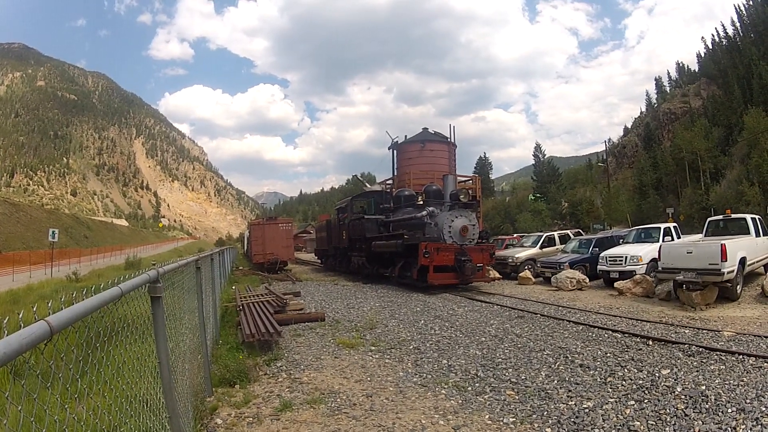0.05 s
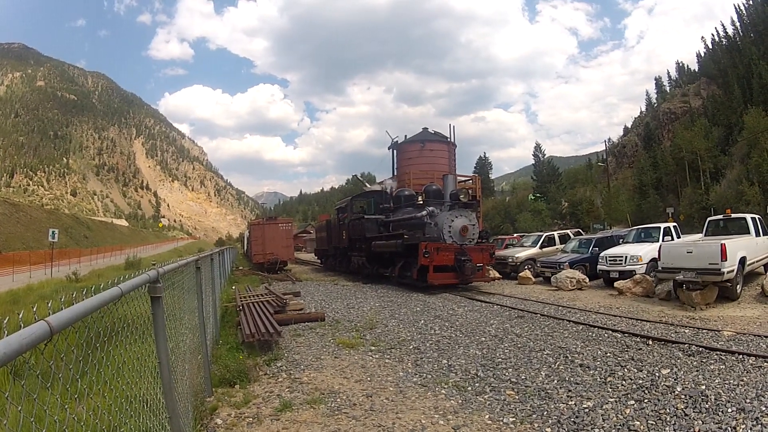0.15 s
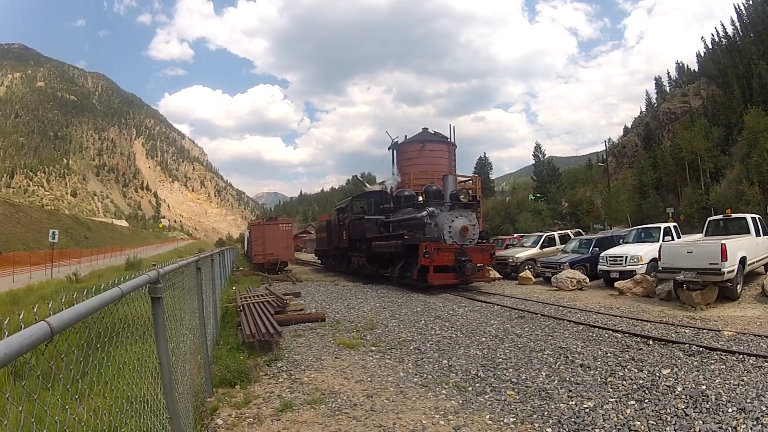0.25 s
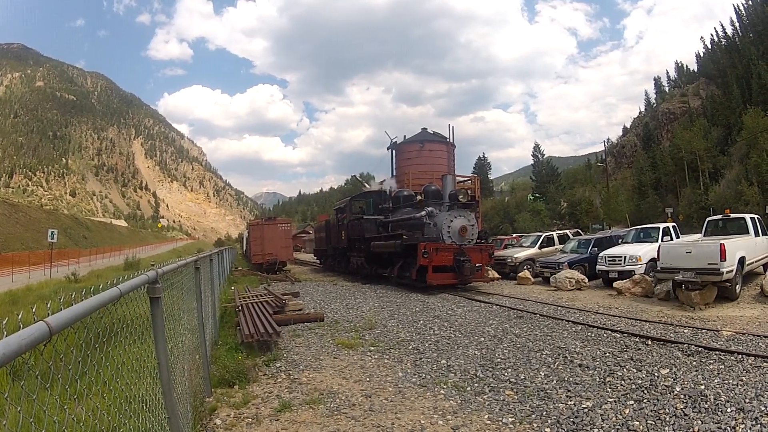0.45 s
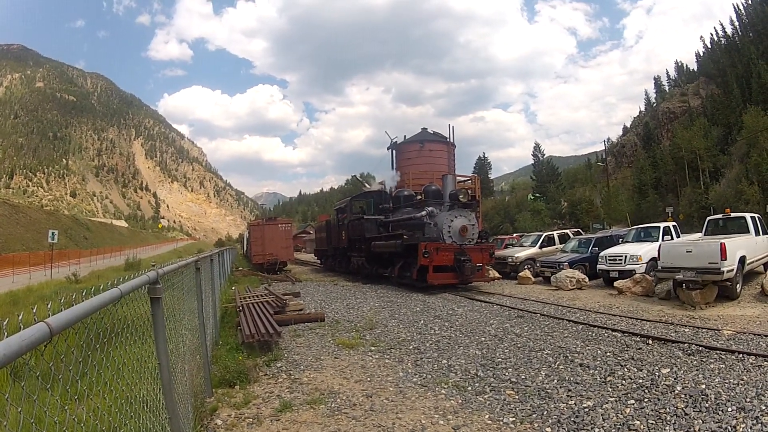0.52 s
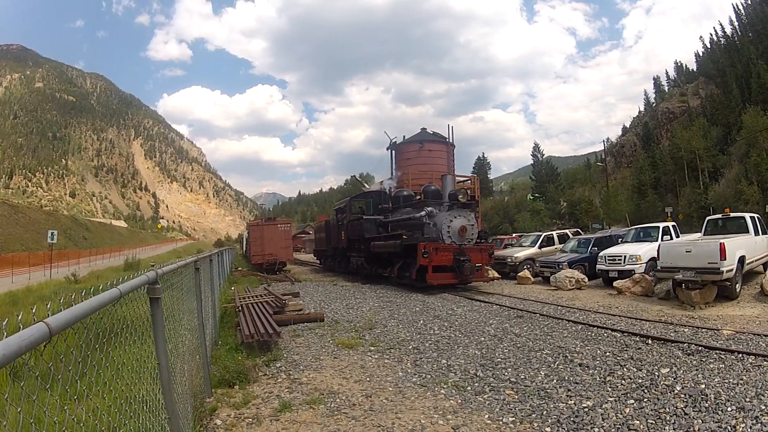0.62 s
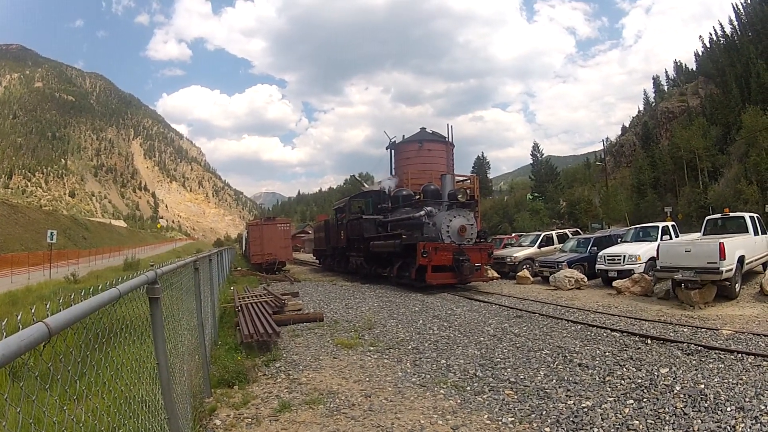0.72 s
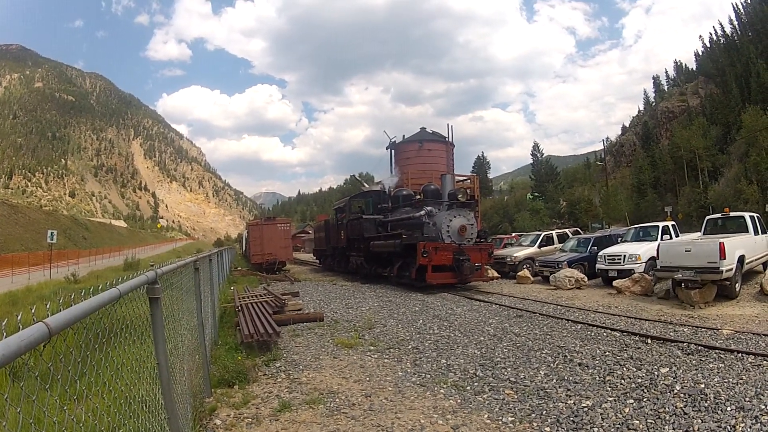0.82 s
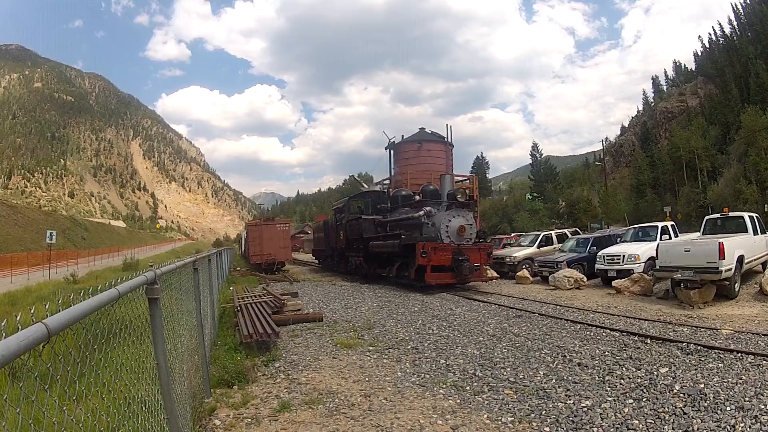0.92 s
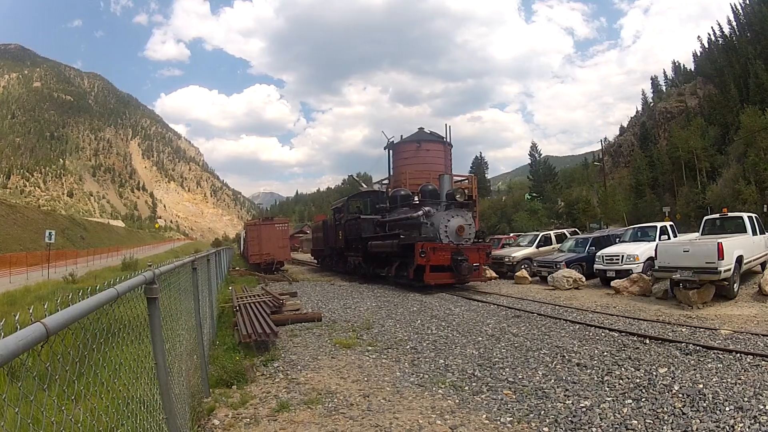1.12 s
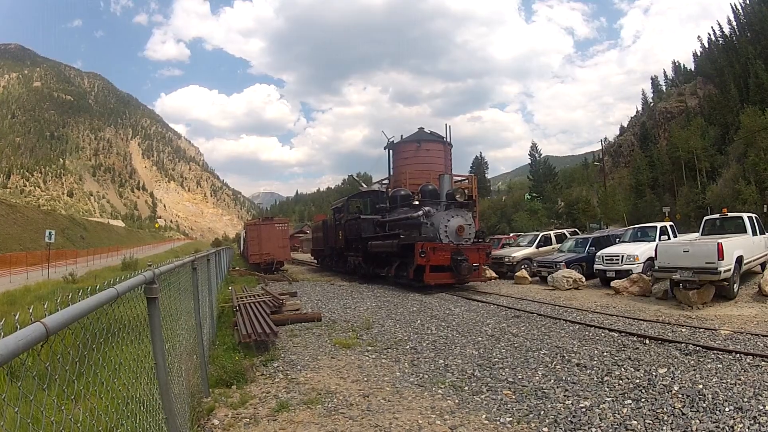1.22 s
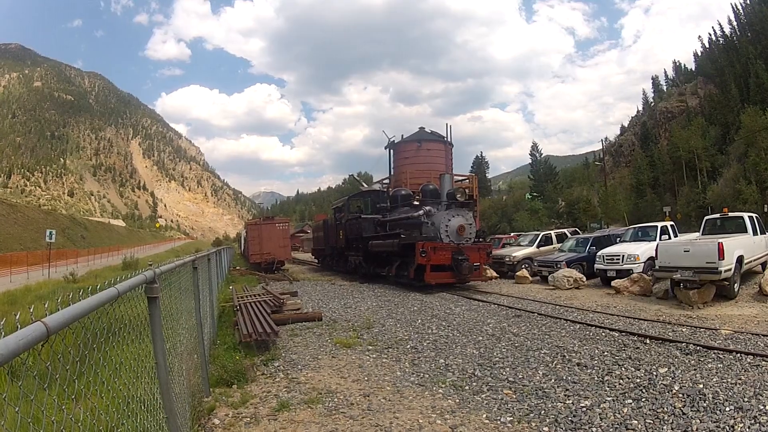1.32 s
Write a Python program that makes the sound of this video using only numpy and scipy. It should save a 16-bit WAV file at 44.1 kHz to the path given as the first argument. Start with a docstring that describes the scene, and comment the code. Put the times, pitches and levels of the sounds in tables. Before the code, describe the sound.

Three quick, breathy steam train whistle toots echo across a mountain valley.

```python
"""Three short toots of a steam locomotive's chime whistle, heard across a mountain valley.
One steam valve drives the chord of pipes and the hiss of the jet; barely open, it leaves a thin squeal.
The whistle reaches the microphone directly, then off the yard and the far slopes, over boiler hiss
and light wind. A coarse mono recorder adds a glassy top."""
import sys
import numpy as np
from scipy import signal
from scipy.fft import rfft, irfft
from scipy.io import wavfile
from scipy.ndimage import uniform_filter1d

SR = 44100
rng = np.random.default_rng(int(sys.argv[2]) if len(sys.argv) > 2 else 0)


def digitize_waveform(pressure):
    """Quantize a signal to 16-bit integers and store it at the path in sys.argv[1].

    Rows of a 2-D input are taken as channels; values are limited to [-1, 1].
    """
    field = np.atleast_2d(pressure).T
    bounded = np.clip(field, -1, 1)
    quanta = np.round(bounded * 32767).astype(np.int16)
    wavfile.write(sys.argv[1], SR, quanta)


N = 59535
T = np.arange(N) / SR
FREQS = np.fft.rfftfreq(N, 1 / SR)

# Pulls of the whistle cord. Each row: peak time in seconds, peak steam flow in dB,
# opening time and closing time in seconds.
CORD_PULLS = [(.281, -28, .090, .074), (.587, -33.7, .110, .096), (.868, -33.9, .126, .094)]
# The chime. Each row: pitch in Hz at full flow, top level in dB, flow in dB at which it speaks,
# onset steepness, share of pitch gained per dB of flow, 2nd and 3rd partial in dB against the 1st.
CHIME_PIPES = [(274, -46.3, -42, 1.5, .0004, -24, -24), (304, -36.3, -42.5, 1.6, .0007, -21, -9),
               (351, -39.7, -42.5, 1.4, .0016, -15, -5), (393, -30.5, -39.3, 1.9, .0027, -28, -33),
               (438, -42, -33, 2.4, .0022, -24, -18), (550, -29.3, -35.7, 3.6, .0032, -36, -29),
               (697, -54.5, -53, 2.2, .0024, -25, -25)]
# Resonances the jet blows without locking to them. Each row: centre in Hz, width in Hz,
# level in dB at full flow, growth in dB per dB of flow.
JET_RESONANCES = [(478, 35, -51, .9), (650, 25, -53.5, .8), (805, 30, -58, .8), (888, 24, -46, .95),
                  (1006, 18, -48.5, .75), (1396, 42, -41.5, .85), (1520, 110, -45, .8),
                  (2040, 46, -33.7, 1.15), (2152, 56, -35, 1.7), (2400, 100, -37.3, 1.05),
                  (2760, 80, -46.5, 1.3), (3053, 22, -50.5, 1.2)]
# Broad hiss of the jet. Each row: frequency in Hz, relative level in dB.
JET_SPECTRUM = [(60, -55), (210, -33), (290, -5), (600, -7), (830, -9), (1130, -10), (1400, -2),
                (1850, -3.5), (1990, 4), (2450, -1), (2600, -8), (3300, -13), (4000, -18), (4900, -14),
                (5700, -26)]
# Thin hiss at the valve seat. Each row: frequency in Hz, relative level in dB.
SEAT_SPECTRUM = [(500, -25), (1500, -6), (2600, 0), (3300, 1), (3900, -3), (4400, 2), (5000, 1), (5750, -8)]
# Overblown tones. Each row: start and end in seconds, pitch in Hz, level in dB.
SQUEALS = [(.48, .84, 2441, -45.5), (.58, 1.08, 1473, -57)]
# Returns from yard and slopes. Each row: delay in seconds, level in dB, centre in Hz, width in octaves.
VALLEY_ECHOES = [(.05, -22, 290, .25), (.07, -22, 900, .5), (.105, -24, 2000, 1.5), (.115, -20, 560, .25),
                 (.14, -23, 1550, .5), (.21, -23, 310, .3), (.3, -25, 950, .4), (.36, -25.5, 400, 1.0)]
# Boiler hiss. Each row: frequency in Hz, relative level in dB.
BOILER_SPECTRUM = [(150, -12), (290, -3), (600, -13), (1100, -12), (1330, -9), (1540, -2), (1800, -13),
                   (2050, 0), (2200, 2), (2450, 0), (2720, 3), (2860, -10), (3150, -13), (3350, -8),
                   (3600, -15), (4000, -18), (4900, -15), (5700, -26)]
# Its slight swell at the microphone. Each row: time in seconds, level in dB.
BOILER_LEVELS = [(0, -54.3), (.5, -53.5), (1.05, -51), (1.35, -53.3)]
# Wind and low rumble. Each row: frequency in Hz, relative level in dB.
WIND_SPECTRUM = [(12, -6), (28, 0), (45, -3), (65, 0), (98, 1), (130, -5), (220, -6), (400, -18),
                 (1000, -40)]

FULL_DB, SHUT_DB = -30, -80  # steam flow
TOOT_SWING_DB, TOOT_ROUNDNESS = 20, 2.15  # swing over the opening or closing time; rounder is flatter
HANG_FROM_S, HANG_TO_S, HANG_DB, HANG_SAG_DB_PER_S = .6, .8, -44.5, 52
DROOP_DB_PER_S = 4  # the steam pressure eases from toot to toot, which flattens the pipes
PITCH_WAVER, WAVER_HZ, FLUTTER, FLUTTER_HZ, SQUEAL_WAVER = .0055, 35, .13, 60, .003
JET_DB, JET_GROWTH, JET_THROB = -37.5, .95, .35
RESONANCE_RISE = .0005  # share of pitch per dB of flow
SEAT_DB, SEAT_OPENS_DB, SEAT_LEAD_S = -56, -57, .02
TAIL_DB, TAIL_T60_S, TAIL_DULL_HZ = -25, 3.0, 2500
WIND_DB = -60.7
HOLD_HZ, BAND_HZ, EDGE_HZ = 12000, 5880, 15350


def pipes(flow):
    """Each pipe speaks above its own flow, levels off, and goes sharp as it is blown harder."""
    push_db = flow - FULL_DB - DROOP_DB_PER_S * T
    chord = np.zeros(N)
    for hz, db, speaks_db, steepness, rise, second_db, third_db in CHIME_PIPES:
        phase = phase_of(hz * (1 + rise * push_db + PITCH_WAVER * wander(WAVER_HZ)))
        level = amp(db) / (1 + amp(steepness * (speaks_db - flow)))
        for k, partial_db in enumerate((0, second_db, third_db), 1):
            flutter = 1 + FLUTTER * wander(FLUTTER_HZ)
            chord += np.sqrt(2) * level * amp(partial_db) * flutter * np.sin(k * phase)
    return chord


def steam_flow():
    """Valve flow in dB: each pull is a rounded arch; the valve hangs slightly open after the second."""
    hang = gate(HANG_FROM_S, HANG_TO_S) * amp(HANG_DB - HANG_SAG_DB_PER_S * (T - HANG_FROM_S))
    power = amp(SHUT_DB) ** 2 + hang ** 2
    for peak_s, db, opening_s, closing_s in CORD_PULLS:
        from_peak = abs(T - peak_s) / np.where(T < peak_s, opening_s, closing_s)
        power += amp(db - TOOT_SWING_DB * from_peak ** TOOT_ROUNDNESS) ** 2
    return 10 * np.log10(power)


def jet(flow, chord):
    """Steam hisses over the lips and excites the upper resonances, throbbing with the chord."""
    push_db = flow - FULL_DB
    hiss = amp(JET_DB + JET_GROWTH * push_db) * coloured(JET_SPECTRUM)
    for hz, width_hz, db, growth in JET_RESONANCES:
        phase = phase_of(hz * (1 + RESONANCE_RISE * push_db))
        band = wander(width_hz / 2) * np.cos(phase) + wander(width_hz / 2) * np.sin(phase)
        hiss += amp(db + growth * push_db) * band
    beats = abs(signal.hilbert(chord))
    throb = beats / (uniform_filter1d(beats, size=900) + 1e-6) - 1
    return hiss * (1 + JET_THROB * throb)


def seat_hiss(flow):
    """Steam hisses through the valve seat, a little ahead of the pipes, steady once it cracks open."""
    early_flow = np.interp(T + SEAT_LEAD_S, T, flow)
    return amp(SEAT_DB) * coloured(SEAT_SPECTRUM) / (1 + amp(2 * (SEAT_OPENS_DB - early_flow)))


def squeal():
    """Thin overblown tones from a nearly shut valve."""
    tones = np.zeros(N)
    for start, end, hz, db in SQUEALS:
        phase = phase_of(hz * (1 + SQUEAL_WAVER * wander(FLUTTER_HZ)))
        tones += gate(start, end) * amp(db) * unit(np.sin(phase))
    return tones


def valley(whistle):
    """The near yard and the far slopes send back coloured echoes and a long dull tail."""
    tail = rng.standard_normal(N) * amp(-60 * T / TAIL_T60_S) * np.minimum(T / .06, 1)
    response = amp(TAIL_DB) * rfft(tail / np.linalg.norm(tail)) / np.hypot(1, FREQS / TAIL_DULL_HZ)
    for delay, db, hz, octaves in VALLEY_ECHOES:
        colour = np.exp(-.5 * (np.log2((FREQS + 1) / hz) / octaves) ** 2)
        response += amp(db) * colour * np.exp(-2j * np.pi * FREQS * delay)
    return signal.fftconvolve(whistle, irfft(response, N))[:N]


def boiler():
    """The boiler hisses softly behind the whistle."""
    return amp(np.interp(T, *np.transpose(BOILER_LEVELS))) * coloured(BOILER_SPECTRUM)


def wind():
    """Light wind lays a low rumble under the valley."""
    return amp(WIND_DB) * coloured(WIND_SPECTRUM)


def amp(db):
    """Decibels to gain."""
    return 10 ** (np.asarray(db) / 20)


def unit(x):
    """Scales to rms 1."""
    return x / np.sqrt(np.mean(x ** 2) + 1e-20)


def noise(gain):
    """Noise of rms 1, shaped by a gain at each frequency."""
    return unit(irfft(rfft(rng.standard_normal(N)) * gain, N))


def coloured(spectrum):
    """Noise that follows a (Hz, dB) spectrum."""
    hz, db = np.transpose(spectrum)
    return noise(amp(np.interp(np.log(FREQS + 1), np.log(hz), db)))


def wander(rate_hz):
    """Smooth random drift up to about the given rate."""
    return noise(1 / (1 + (FREQS / rate_hz) ** 2))


def phase_of(hz):
    """Running phase of a pitch curve, from a random start."""
    return 2 * np.pi * (np.cumsum(hz) / SR + rng.random())


def gate(start, end, fade_s=.03):
    """Fades in at start and out at end."""
    return np.clip(np.minimum(T - start, end - T) / fade_s, 0, 1)


def low_pass(x, edge_hz):
    """Steep low-pass."""
    return signal.fftconvolve(x, signal.firwin(301, edge_hz, window=("kaiser", 8), fs=SR), "same")


def scene():
    """At the microphone: the direct whistle, its echoes, the boiler and the wind."""
    flow = steam_flow()
    chord = pipes(flow)
    whistle = chord + jet(flow, chord) + seat_hiss(flow) + squeal()
    return (whistle + valley(whistle) + boiler() + wind())[None]


def record(dry):
    """The recorder holds samples at a low rate, mirroring the sound into the treble, then cuts the top."""
    mirrored = low_pass(dry[0], BAND_HZ) * (1 + 2 * np.cos(2 * np.pi * HOLD_HZ * T))
    held = irfft(rfft(mirrored) * np.sinc(FREQS / HOLD_HZ), N)
    return low_pass(held, EDGE_HZ)[None]


dry = scene()
out = record(dry)
digitize_waveform(out)
```